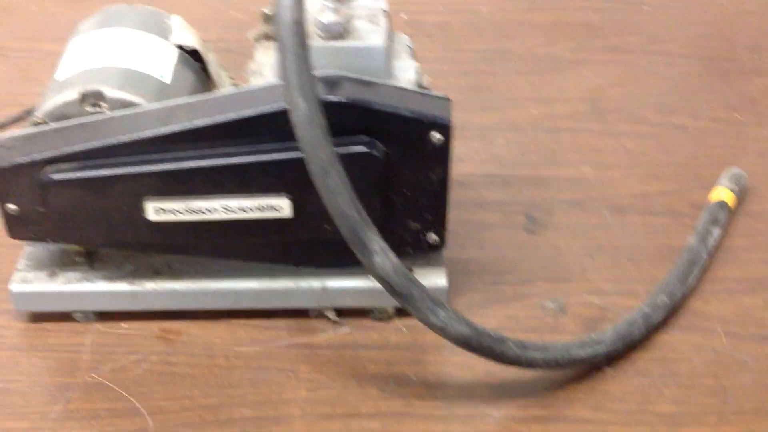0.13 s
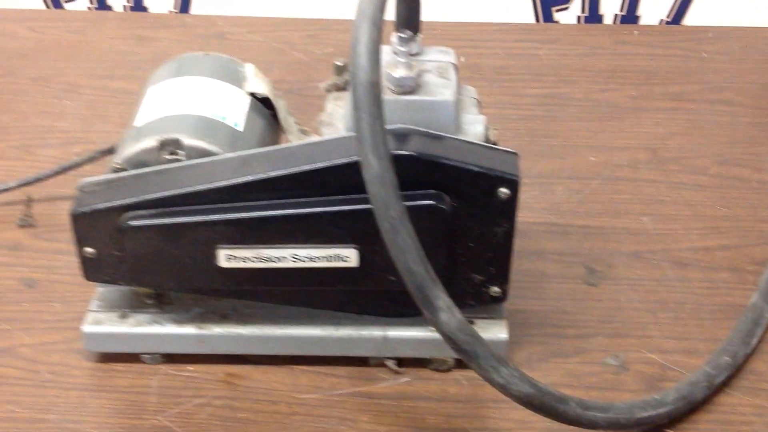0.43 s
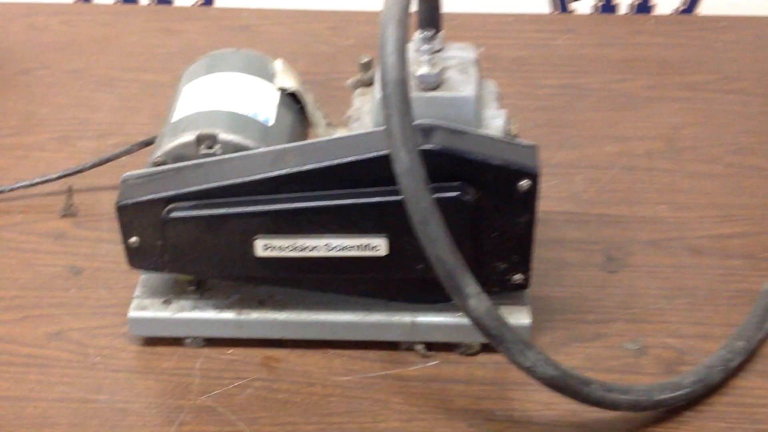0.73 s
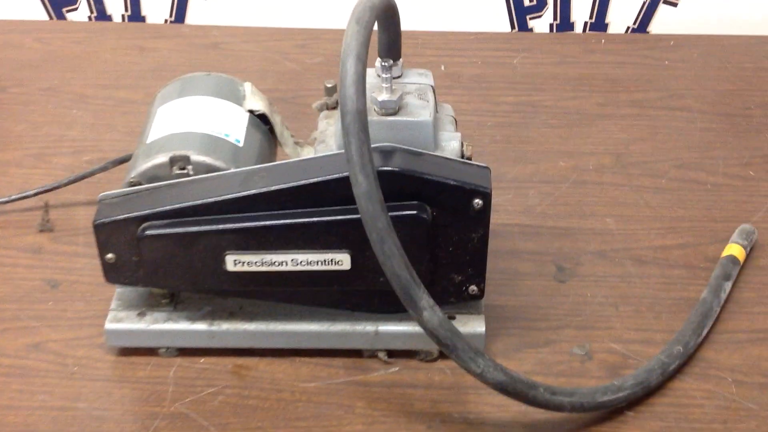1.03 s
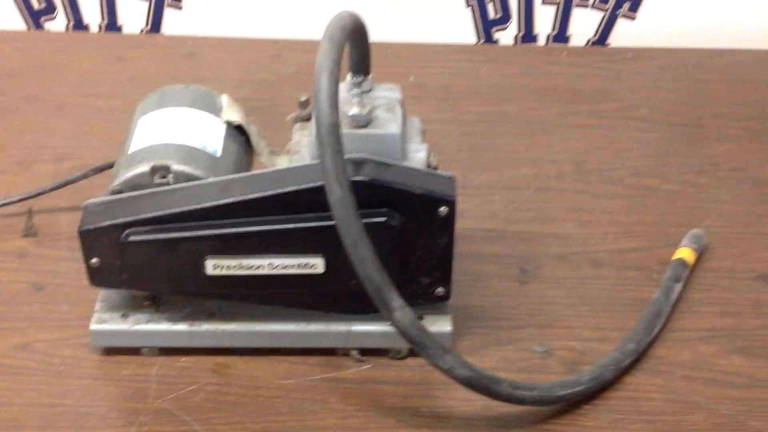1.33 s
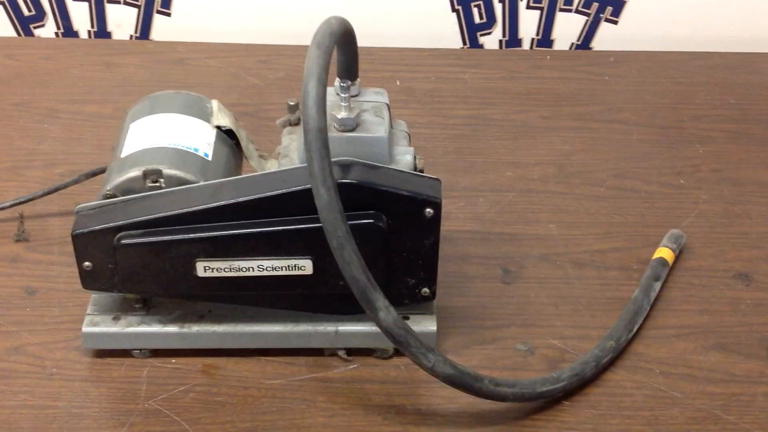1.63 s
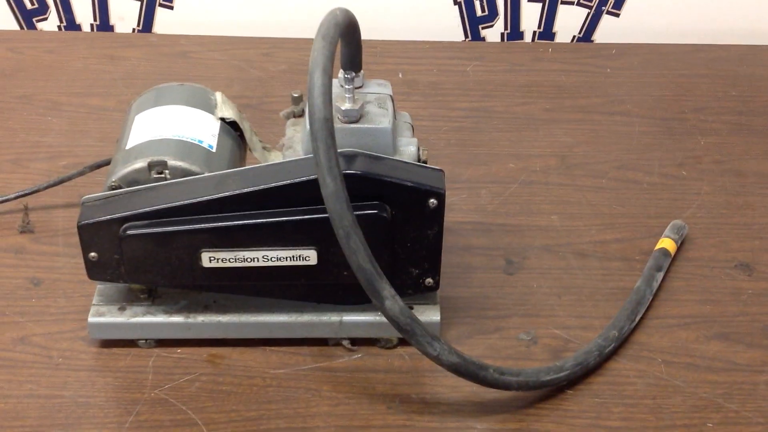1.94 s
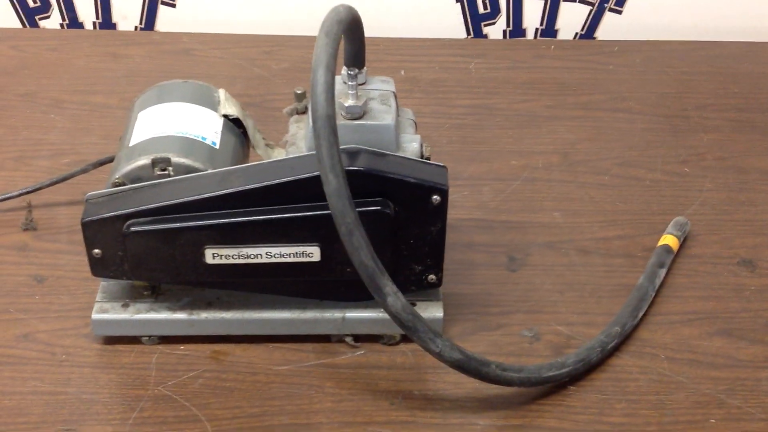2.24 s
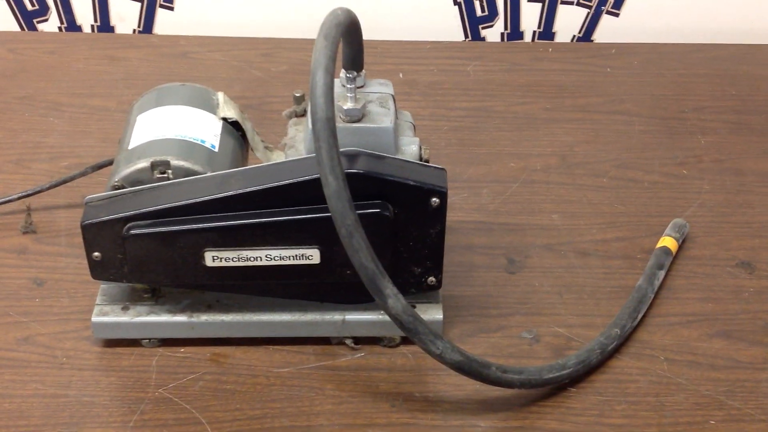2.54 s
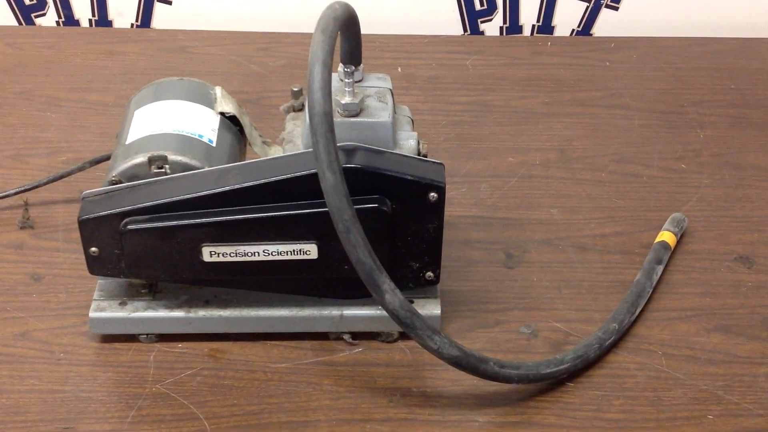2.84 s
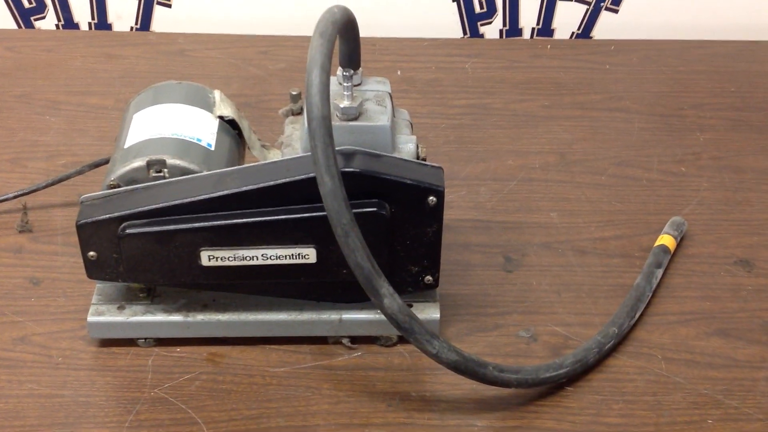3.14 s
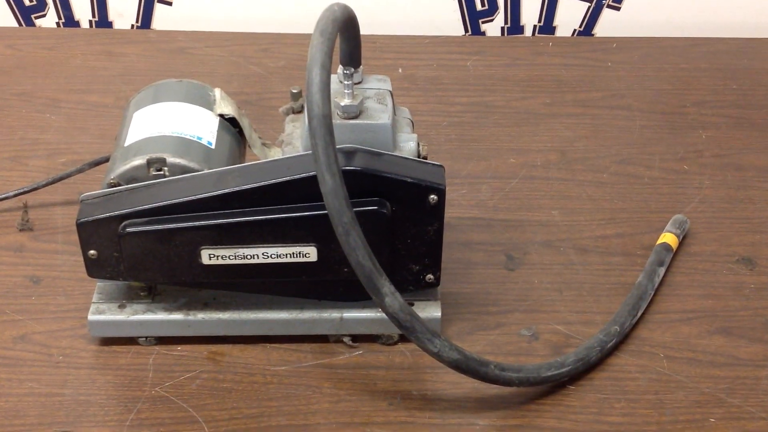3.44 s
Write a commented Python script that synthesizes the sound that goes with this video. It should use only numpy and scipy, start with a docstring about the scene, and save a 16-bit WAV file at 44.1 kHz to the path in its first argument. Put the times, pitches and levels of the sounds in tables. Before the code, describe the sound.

A belt-driven vacuum pump runs with a fast, even clatter, hissing and humming indoors.

```python
"""A belt-driven rotary-vane vacuum pump on a wooden table, close under a hand-held microphone.
Twice a turn the exhaust valve slaps, flutters and sends bubbles through the oil, while air hisses up
to each stroke. The belt rumbles in its guard, its joint knocks on the pulley and the motor hums.
The room is short and dull; in the first second a hand rubs and softly bumps the microphone."""
import sys
import numpy as np
from scipy import signal
from scipy.fft import rfft, irfft
from scipy.io import wavfile
from scipy.ndimage import uniform_filter1d

SR = 44100
rng = np.random.default_rng(int(sys.argv[2]) if len(sys.argv) > 2 else 0)


def int16_out(signal):
    """Quantize to a 16-bit WAV file."""
    q = np.round(np.clip(np.atleast_2d(signal).T, -1, 1) * 32767)
    wavfile.write(sys.argv[1], SR, q.astype(np.int16))


N = 157878

# exhaust valve strokes, two per turn of the pump: start_s, level_db
VALVE_STROKES = [(0.1171, -24.5), (0.1665, -24.5), (0.2166, -25), (0.2645, -25), (0.313, -25.5),
                 (0.364, -21), (0.4112, -25.5), (0.4628, -19), (0.5094, -27), (0.5592, -20), (0.6076, -30),
                 (0.6564, -24), (0.7055, -32), (0.7546, -22.5), (0.8016, -27.5), (0.854, -25.5),
                 (0.9009, -26.5), (0.9503, -27.5), (0.9989, -27), (1.049, -26), (1.0964, -30.5),
                 (1.1461, -25.5), (1.1951, -24), (1.2437, -26), (1.2925, -29.5), (1.342, -24),
                 (1.3899, -26.5), (1.4409, -26), (1.4892, -26.5), (1.538, -25.5), (1.5861, -26.5),
                 (1.636, -27), (1.6844, -25), (1.733, -30), (1.7827, -28.5), (1.8313, -27.5), (1.8818, -27),
                 (1.9295, -27.5), (1.9789, -24), (2.0262, -27), (2.0761, -24), (2.1256, -25),
                 (2.174, -26.5), (2.223, -24), (2.272, -30), (2.3202, -24), (2.3706, -23), (2.4193, -22),
                 (2.4675, -28.5), (2.515, -28.5), (2.5668, -27.5), (2.615, -27), (2.663, -27.5),
                 (2.7119, -24), (2.7612, -25.5), (2.81, -25), (2.8602, -22), (2.9083, -29), (2.957, -26.5),
                 (3.0057, -28.5), (3.0546, -24), (3.1039, -26.5), (3.1533, -27.5), (3.201, -28),
                 (3.251, -26.5), (3.2985, -25.5), (3.3483, -26.5), (3.3977, -24), (3.446, -27),
                 (3.4962, -24.5), (3.544, -25)]
# extra slaps when a belt knock jolts the valve just before a stroke: start_s, level_db
VALVE_JOLTS = [(0.3595, -23.5), (0.6512, -32), (0.943, -34), (1.2354, -27.5), (1.527, -39), (1.8185, -35)]
# ring of the valve and its housing: pitch_hz, level_db, t60_s
HOUSING_MODES = [(5660, -6, 0.028), (5750, -5, .02), (6070, -2.5, 0.09), (6730, -9, 0.09),
                 (6900, -87, .015), (7710, 0, 0.06), (8380, -1, .024), (8710, 21, 0.0073),
                 (8860, -11, 0.015), (9920, 6.5, 0.047), (10510, 7.5, 0.039), (10950, -13, .018),
                 (13620, -12, .015), (14600, -16, .015)]
# oil spat through the valve: frequency_hz, level_db
SPIT_SPECTRUM = [(1000, -33), (2700, -16.5), (3600, -15.5), (5600, 1), (7200, -1.5), (9500, 1.5),
                 (11200, -1), (12200, -8.5), (15000, -11)]
# oil bubbles after each stroke: from_hz, to_hz, level_db, delay_s, fade_s, trend_db_per_s
OIL_BUBBLES = [(2117, 2230, -37.5, 0.0033, .011, -0.5), (1000, 1095, -35, 0.00383, .012, -3.5)]
# churned oil: frequency_hz, level_db
GURGLE_SPECTRUM = [(300, 11), (700, -32), (1080, 1), (1500, -10), (2050, 6.5), (2450, 0.5), (2800, 2),
                   (3400, -6), (4000, -6), (6000, -1), (12000, -30)]

# air hiss, falling as the hose empties: time_s, level_db
HISS_LEVELS = [(.09, -36.5), (.27, -32.5), (.5, -32.5), (.7, -37.5), (1, -39), (1.6, -39), (2.4, -40.5),
               (3.57, -41)]
# air hiss: frequency_hz, level_db
HISS_SPECTRUM = [(500, -16), (1100, -11), (1600, -32), (2800, -13), (3700, -12), (4400, -8), (4700, -1),
                 (4850, 1), (5030, -6), (5280, 5.5), (5600, -3.5), (6400, -6), (8500, -10.5), (10500, -12),
                 (12500, -13.5), (15000, -40)]
# rush of air once a turn: frequency_hz, level_db
RUSH_SPECTRUM = [(300, -39), (750, 4), (1500, -9.5), (2500, -5.5), (3700, -8), (5300, 17.5), (6500, 1.5),
                 (10000, -14), (15000, -39)]
# air blown out through the valve: frequency_hz, level_db
BLOW_SPECTRUM = [(1000, -46), (2800, -7.5), (3500, -17), (4000, -8), (4600, -7), (5600, 3), (6500, -5),
                 (9000, -16), (15000, -9.5)]

# the belt joint hits the motor pulley once a lap: start_s, level_db
JOINT_KNOCKS = [(0.07, -23), (.360, -23), (.652, -23.5), (.944, -21.5), (1.2359, -22.5), (1.528, -23.5),
                (1.819, -21), (2.1119, -24), (2.402, -22.5), (2.694, -27), (2.985, -26.5), (3.276, -27.5),
                (3.569, -49)]
# contacts of the joint as it passes the pulley: delay_s, thud_db, rattle_db
JOINT_CONTACTS = [(0, 1.5, -7), (.0088, -19, -21.5)]
# ring of the belt guard and base: pitch_hz, level_db, t60_s
BELT_GUARD_MODES = [(156, -15, 0.098), (222, -14, 0.055), (269, -5.5, 0.16), (342, 1, 0.11), (432, -2, 0.1),
                    (587, -12, 0.12), (732, -9, 0.14), (1025, -12, 0.019), (1810, -36, 0.056),
                    (1920, -9, .05)]
# rattle of the guard: frequency_hz, level_db
RATTLE_SPECTRUM = [(60, -34), (200, -7), (400, 4.5), (600, -8.5), (780, 5.5), (930, -13), (1250, -3),
                   (1800, -6.5), (2800, -8.5), (4000, -13.5), (8000, -6), (15000, -50)]
# the slack belt brushes the guard: start_s, level_db
BELT_BRUSHES = [(.845, -37), (1.03, -56), (1.35, -37.5), (1.452, -36), (1.738, -36), (2.03, -38.5),
                (2.328, -32.5), (2.605, -34), (2.895, -33), (2.918, -38.5), (3.186, -34.5), (3.212, -39),
                (3.42, -33), (3.477, -34), (3.505, -43)]
# the frame shaken by the belt: frequency_hz, level_db
RUMBLE_SPECTRUM = [(25, -7), (50, -40), (68, -29), (90, -5.5), (135, -6.5), (175, -6.5), (215, 4),
                   (240, -3), (272, 3), (305, -1.5), (360, -0.5), (400, -8.5), (440, -5), (520, -12.5),
                   (640, -18), (760, -14), (920, -20), (1500, -19.5), (3000, -30.5)]
# mains hum of the motor: time_s, level_db
HUM_LEVELS = [(.09, -40.5), (.5, -40), (.8, -43.5), (1.2, -44), (1.7, -50), (2.5, -47.5), (3.57, -48)]

# soft bumps on the microphone: start_s, level_db, pitch_hz, width_s
MIC_BUMPS = [(.0885, -19.5, 1000, .0007), (0.097, -14.5, 1520, 0.00033), (0.1, -23, 1700, 0.0016),
             (.1125, -14.5, 504, .0014), (0.1262, -12.5, 1620, 0.0011), (0.127, -18, 268, 0.004),
             (0.154, -5, 1000, 0.00032), (0.157, -21, 269, 0.0087), (0.176, -25, 1660, 0.0027),
             (0.304, -24, 1000, 0.0015), (.7445, -19.5, 290, 0.0036), (0.9237, -13.5, 700, 0.001)]
# a hand rubbing the microphone: frequency_hz, level_db
RUB_SPECTRUM = [(40, -36), (120, 7), (300, 6), (900, 4), (1800, -6.5), (3000, -8.5), (8000, -13)]


def valve_slaps(gain_db=4.5, flutter_s=0.00086, fade_s=0.0057, bounces=12):
    """The exhaust valve flutters shut: each stroke is a fading run of slaps that rings the housing."""
    t, out = np.arange(4096) / SR, np.zeros(N)
    for start_s, level_db in list(VALVE_STROKES) + list(VALVE_JOLTS):
        gaps_s = flutter_s * np.abs(1 + 0.14 * rng.standard_normal(bounces))
        sizes = undb(2.5 * rng.standard_normal(bounces))
        housing = ring(HOUSING_MODES, t, detune=0.0045)
        stroke = np.zeros(len(t))
        for lag_s, size in zip(np.cumsum(gaps_s) - gaps_s[0], sizes):
            add(stroke, lag_s, size * np.exp(-lag_s / fade_s) * housing)
        stroke /= np.sqrt(np.sum(stroke ** 2) / (flutter_s * SR))  # every stroke gets the same energy: mean power 1 over one flutter period
        add(out, start_s, undb(level_db + gain_db) * stroke)
    return out


def oil_spit(gain_db=0.5, attack_s=0.00043, fade_s=0.0057, grain=0.26):
    """Oil spits through the valve in a gritty burst at every stroke and jolt."""
    t, envelope = np.arange(4096) / SR, np.zeros(N)
    burst = (1 - np.exp(-t / attack_s)) * np.exp(-t / fade_s)
    for start_s, level_db in list(VALVE_STROKES) + list(VALVE_JOLTS):
        add(envelope, start_s, undb(level_db + gain_db) * burst)
    spray = rng.standard_normal(N)
    flicker = unit_rms(uniform_filter1d(rng.standard_normal(N), size=16))
    grit = spray * np.exp(grain * np.tanh(flicker))
    return envelope * colour(grit, SPIT_SPECTRUM)


def oil_bubbles(glide_s=0.0045, rise_s=0.0039, weak_vane_db=-3, gurgle_db=-12.5):
    """Each stroke churns the oil and frees bubbles that glide up in pitch, louder on harder strokes."""
    t, out = np.arange(4096) / SR, np.zeros(N)
    for k, (start_s, stroke_db) in enumerate(VALVE_STROKES):
        force_db = 0.54 * (stroke_db + 20) + weak_vane_db * (k % 2 == 0)
        for from_hz, to_hz, level_db, delay_s, fade_s, trend_db_per_s in OIL_BUBBLES:
            sharpness, size, lateness = rng.standard_normal(3)
            glide_hz = to_hz + (from_hz - to_hz) * np.exp(-t / glide_s)
            pitch_hz = glide_hz * (1 + 0.0079 * sharpness)
            tone = np.sin(2 * np.pi * np.cumsum(pitch_hz) / SR)
            envelope = (1 - np.exp(-t / rise_s)) * np.exp(-t / fade_s)
            gain = 2 * undb(level_db + trend_db_per_s * start_s + force_db + 2.1 * size)
            add(out, start_s + delay_s * np.exp(0.39 * lateness), gain * envelope * tone)
    return out + undb(gurgle_db) * puffs(VALVE_STROKES, GURGLE_SPECTRUM, rise_s=0.0051)


def air_hiss(swell_db=2.5, peak_phase=0.99):
    """The hiss swells as each vane builds up pressure, peaking just ahead of the stroke."""
    strokes_s = np.array(VALVE_STROKES)[:, 0]
    stroke_phase = np.interp(np.arange(N) / SR, strokes_s, np.arange(len(strokes_s)))
    pulsing = undb(swell_db * np.cos(2 * np.pi * (stroke_phase - peak_phase)))
    return noise(HISS_SPECTRUM) * level_curve(HISS_LEVELS) * pulsing


def air_rush(level_db=-39.5, lead_s=0.021):
    """Air rushes once a turn, just before every second stroke."""
    rushes = [(start_s - lead_s, level_db) for start_s, _ in VALVE_STROKES[1::2]]
    return puffs(rushes, RUSH_SPECTRUM, rise_s=0.0049)


def air_blow(gain_db=5, trend_db_per_s=-11):
    """Air blows out through the valve at every stroke and jolt, dwindling as the hose empties."""
    blows = [(start_s, level_db + gain_db + trend_db_per_s * start_s)
             for start_s, level_db in list(VALVE_STROKES) + list(VALVE_JOLTS)]
    return puffs(blows, BLOW_SPECTRUM, rise_s=0.002)


def belt_knocks(thud_gain_db=-6, rattle_fade_s=0.014, guard_low_hz=171):
    """The belt joint thuds on the pulley and rattles the guard, which radiates little bass."""
    t = np.arange(8192) / SR
    thuds, rattle_envelope = np.zeros(N), np.zeros(N)
    for start_s, level_db in JOINT_KNOCKS:
        for delay_s, thud_db, rattle_db in JOINT_CONTACTS:
            contact_s = start_s + delay_s
            guard = ring(BELT_GUARD_MODES, t, detune=0.0095)
            add(thuds, contact_s, undb(level_db + thud_db + thud_gain_db) * guard)
            add(rattle_envelope, contact_s, undb(level_db + rattle_db) * np.exp(-t / rattle_fade_s))
    low_cut = signal.butter(2, guard_low_hz, "high", fs=SR, output="sos")
    return signal.sosfilt(low_cut, thuds + rattle_envelope * noise(RATTLE_SPECTRUM))


def belt_brushes():
    """The slack belt brushes the guard between knocks."""
    return puffs(BELT_BRUSHES, RATTLE_SPECTRUM, rise_s=0.0061)


def belt_rumble(level_db=-37, lap_s=0.2915, repeat_share=0.5):
    """The uneven belt shakes the frame; a share of the power repeats on every lap."""
    repeating = np.sqrt(repeat_share) * np.resize(rng.standard_normal(int(lap_s * SR)), N)
    fresh = np.sqrt(1 - repeat_share) * rng.standard_normal(N)
    return undb(level_db) * colour(repeating + fresh, RUMBLE_SPECTRUM)


def motor(hum_hz=120.6, shake_hz=154.4, shake_db=-53):
    """Mains hum and a steady shake of the frame, low under the pump."""
    t = np.arange(N) / SR
    hum = level_curve(HUM_LEVELS) * np.sin(2 * np.pi * hum_hz * t)
    shake = undb(shake_db) * np.sin(2 * np.pi * shake_hz * t)
    return np.sqrt(2) * (hum + shake)


def mic_handling(rub_db=-30, rub_peak_s=0.097, rub_width_s=0.073):
    """Handling noise: a brief rub of the hand and short, dead bumps right on the microphone."""
    rub_envelope = np.exp(-0.5 * ((np.arange(N) / SR - rub_peak_s) / rub_width_s) ** 2)
    out = undb(rub_db) * noise(RUB_SPECTRUM) * rub_envelope
    t = np.arange(2048) / SR
    for start_s, level_db, pitch_hz, width_s in MIC_BUMPS:
        add(out, start_s, undb(level_db) * swell(t, width_s / 2) * np.sin(2 * np.pi * pitch_hz * t))
    return out


def room(direct, tail_db=-5.5, t60_s=0.35, dull_hz=4000):
    """The room puts a short, dull tail behind the close sound."""
    t = np.arange(SR // 2) / SR
    tail = rng.standard_normal(len(t)) * np.exp(-np.log(1000) * t / t60_s)
    tail /= np.sqrt(np.sum(tail ** 2))
    tail = signal.sosfilt(signal.butter(1, dull_hz, fs=SR, output="sos"), tail)
    return direct + undb(tail_db) * signal.fftconvolve(direct, tail)[:N]


def undb(db):
    """Decibels to amplitude."""
    return 10 ** (np.asarray(db) / 20)


def unit_rms(x):
    """Scale to rms 1."""
    return x / np.sqrt(np.mean(x ** 2))


def level_curve(levels):
    """Gain over time from rows of time_s, level_db."""
    return undb(np.interp(np.arange(N) / SR, *np.array(levels).T))


def colour(x, spectrum):
    """Equalise by rows of frequency_hz, level_db; rms 1."""
    frequency_hz, level_db = np.array(spectrum).T
    bins_hz = np.maximum(np.arange(len(x) // 2 + 1) * SR / len(x), 1)
    gain = undb(np.interp(np.log(bins_hz), np.log(frequency_hz), level_db))
    return unit_rms(irfft(rfft(x) * gain, len(x)))


def noise(spectrum):
    """Coloured noise, rms 1."""
    return colour(rng.standard_normal(N), spectrum)


def add(out, start_s, x):
    """Mix x into out from start_s on."""
    i = int(np.clip(round(start_s * SR), 0, len(out)))
    out[i:i + len(x)] += x[:len(out) - i]


def ring(modes, t, detune):
    """Decaying modes, each slightly detuned at random."""
    tunings = 1 + detune * rng.standard_normal(len(modes))
    return sum(undb(level_db) * np.sin(2 * np.pi * pitch_hz * tuning * t) * np.exp(-np.log(1000) * t / t60_s)
               for (pitch_hz, level_db, t60_s), tuning in zip(modes, tunings))


def swell(t, rise_s):
    """Envelope that peaks at 1 after rise_s, then fades."""
    return t / rise_s * np.exp(1 - t / rise_s)


def puffs(events, spectrum, rise_s):
    """Coloured noise that swells at each row of start_s, level_db."""
    envelope, puff = np.zeros(N), swell(np.arange(4096) / SR, rise_s)
    for start_s, level_db in events:
        add(envelope, start_s, undb(level_db) * puff)
    return envelope * noise(spectrum)


def scene():
    """The pump in mono from just above; valve, oil, knocks and brushes carry into the room."""
    clatter = room(valve_slaps() + oil_spit() + oil_bubbles() + belt_knocks() + belt_brushes())
    air = air_hiss() + air_rush() + air_blow()
    return (clatter + air + belt_rumble() + motor() + mic_handling())[None]


def record(dry, open_s=0.084, low_cut_hz=89, top_hz=15200):
    """The microphone opens abruptly and cuts the deep bass and the top."""
    is_open = np.arange(N) / SR >= open_s
    low_cut = signal.butter(2, low_cut_hz, "high", fs=SR, output="sos")
    low_pass = signal.ellip(8, 0.2, 70, top_hz, fs=SR, output="sos")
    return signal.sosfilt(low_pass, signal.sosfilt(low_cut, dry * is_open))


dry = scene()
out = record(dry)
int16_out(out)
```